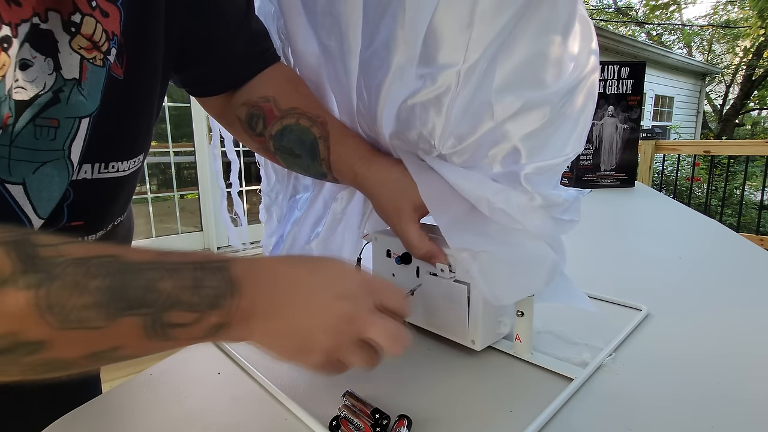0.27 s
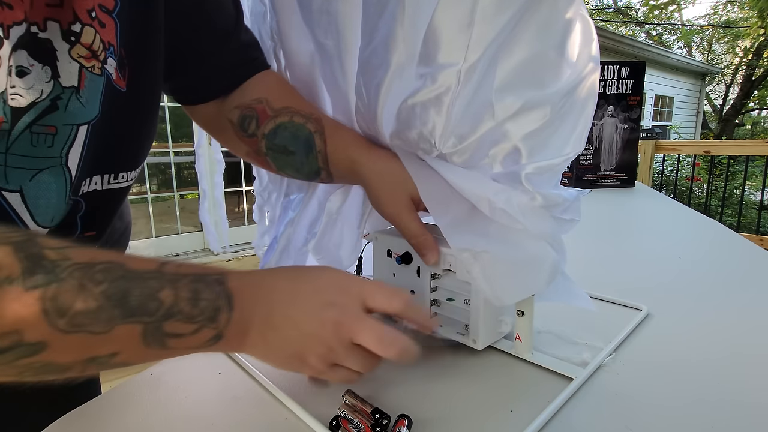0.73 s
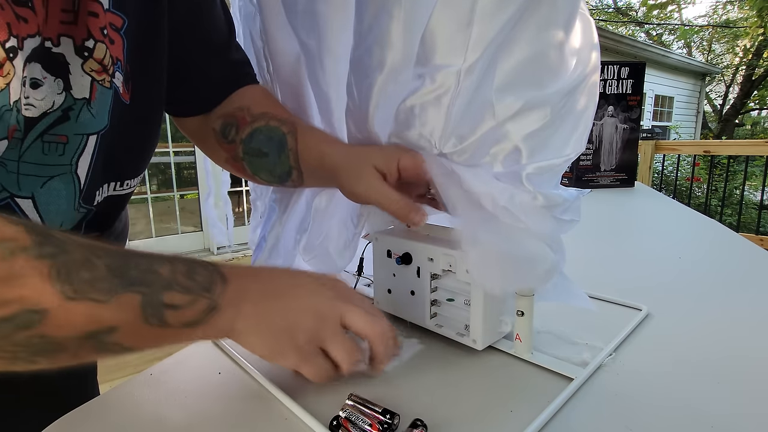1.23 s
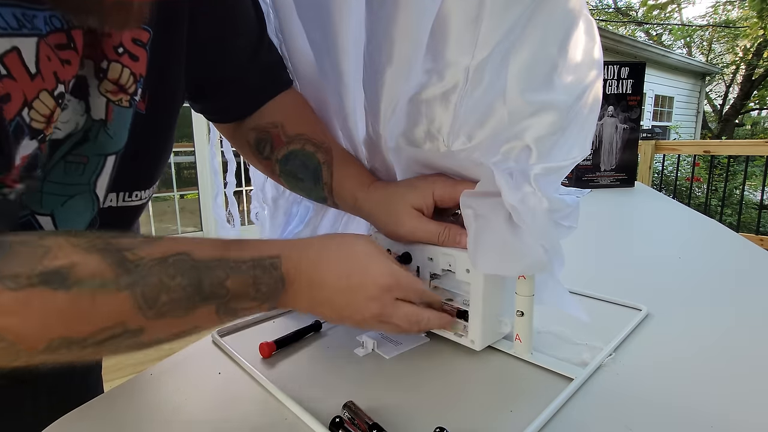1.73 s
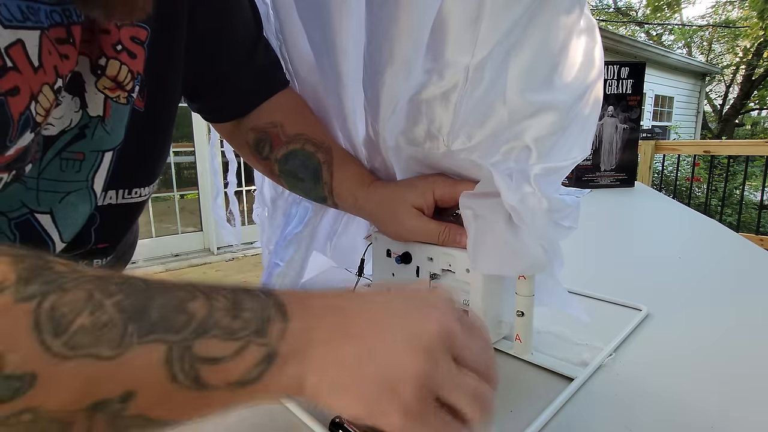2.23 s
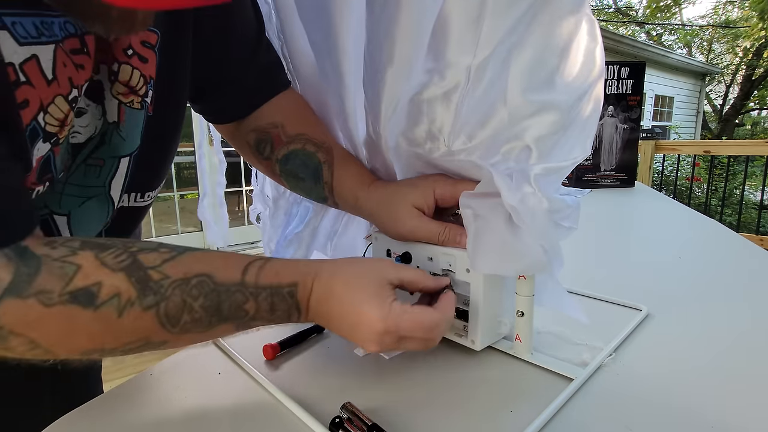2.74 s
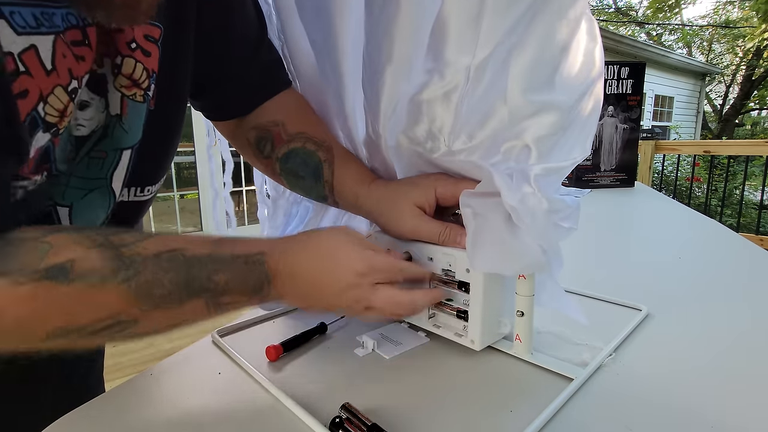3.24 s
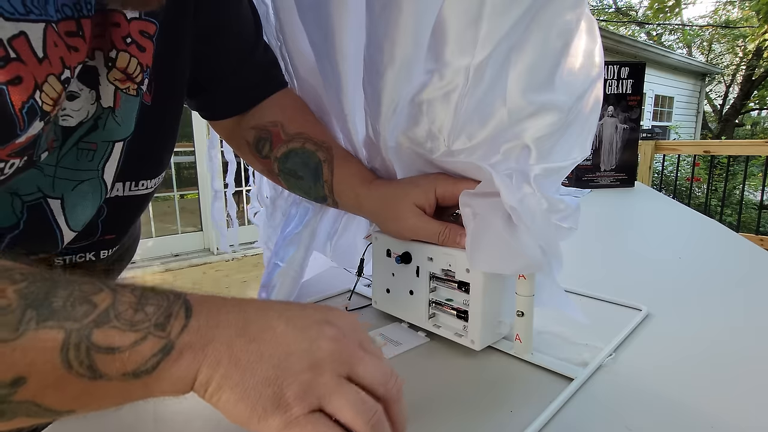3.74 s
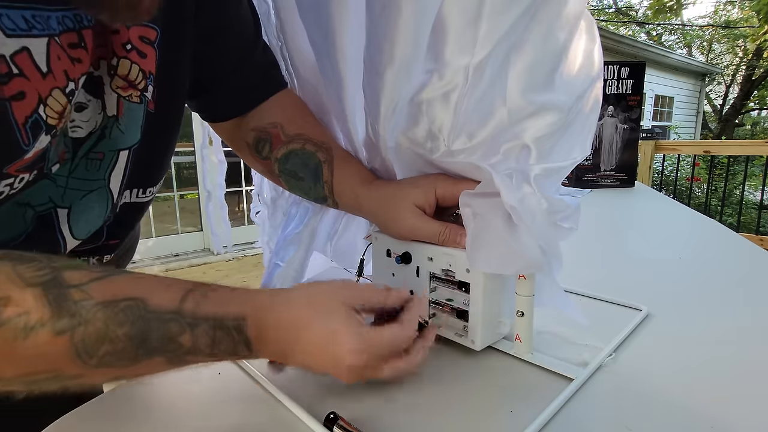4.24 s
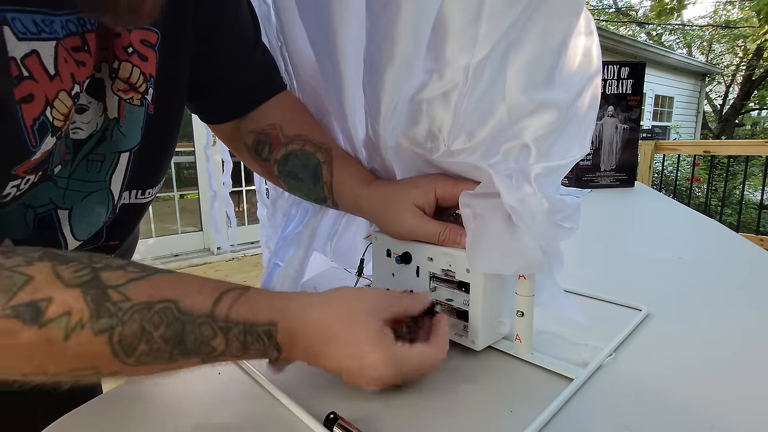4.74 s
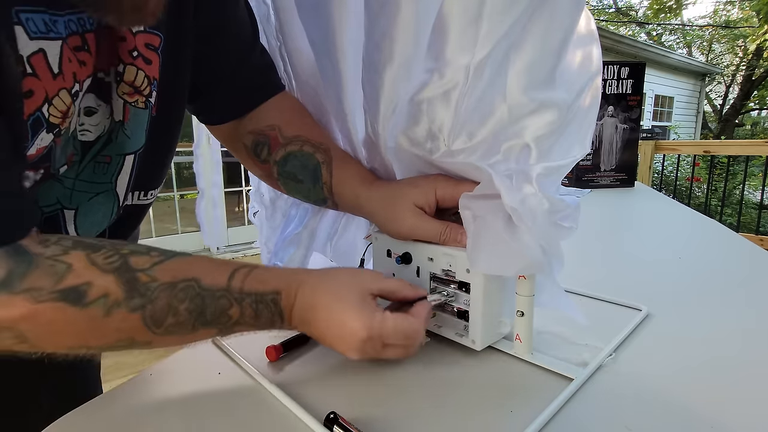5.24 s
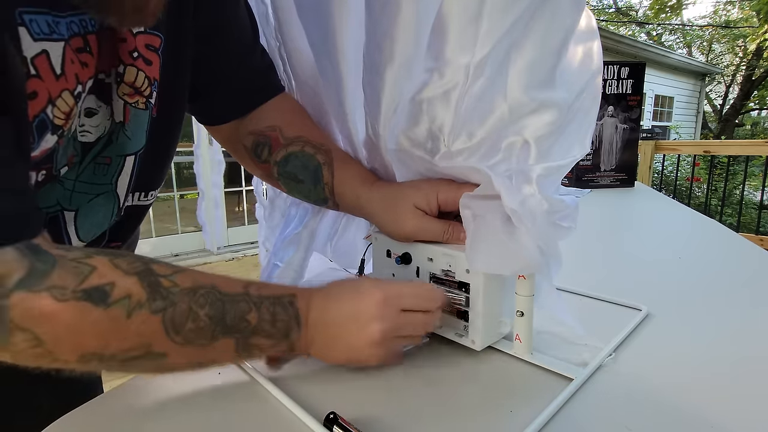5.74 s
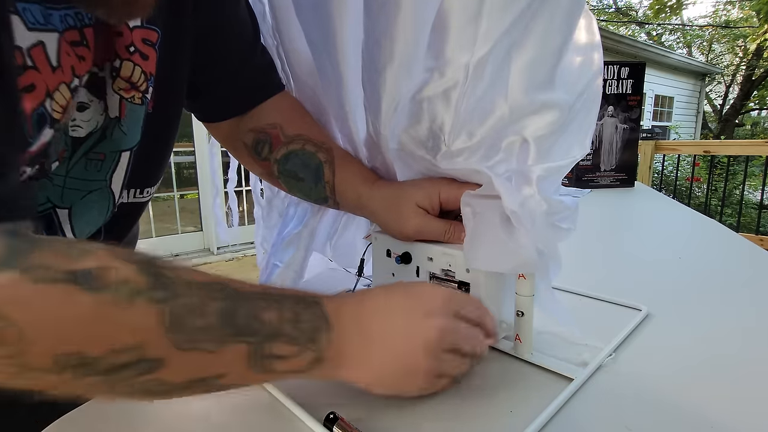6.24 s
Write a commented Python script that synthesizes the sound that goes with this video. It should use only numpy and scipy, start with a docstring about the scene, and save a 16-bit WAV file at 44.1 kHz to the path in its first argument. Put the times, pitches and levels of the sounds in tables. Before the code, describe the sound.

A thin plastic hatch clatters loose and a small tool drops on a table, then batteries knock and click into a hollow plastic housing outdoors.

```python
"""Open deck, plastic table: a hand drops the hatch of a plastic housing and a small tool,
then pushes batteries past their springs into the housing. Blows ring damped modes and noise bursts, with echoes;
rubbing and the noisy tails of blows are shaped noise, as is cloth. Breeze is lumpy bass noise, insects are
throbbing narrow bands, far traffic is low noise under a steady hush."""
import sys
import numpy as np
from scipy import signal
from scipy.fft import rfft, irfft
from scipy.io import wavfile
from scipy.ndimage import uniform_filter1d, map_coordinates

SR = 44100
rng = np.random.default_rng(int(sys.argv[2]) if len(sys.argv) > 2 else 0)


def attenuation_scalar(level_db):
    """Turn a level in dB into a linear amplitude multiplier (20 dB per decade)."""
    decades = np.asarray(level_db, float) / 20
    return 10 ** decades


def transcribe(u):
    """Save the signal u as a 16-bit wav file named by the first command-line argument.

    u: samples, shape (n,) or (channels, n), limited to [-1, 1]; the rate is SR.
    q: integer samples, one column per channel.
    """
    v = np.clip(np.atleast_2d(u).T, -1, 1)
    q = np.round(v * 32767).astype(np.int16)
    wavfile.write(sys.argv[1], SR, q)


N = 285900

# Hatch against housing and table: (time [s], body [dB], sharpness [dB], thud [dB], snap [dB])
HATCH_BLOWS = [(0.045, -22.5, 1, -48, -30), (0.319, -18.5, 8, -18, -5.5), (0.331, -21.5, 3.5, -12.5, -12),
               (0.369, -27, 8.5, -18, -19.5), (0.384, -26.5, 3, -20, -43), (0.63, -51, 19.5, -35, -78),
               (0.672, -14.5, -3, -13.5, -36), (0.68, -23, 7, -16.5, -13), (0.702, -28.5, 0, -19, -52),
               (0.737, -23, -1.5, -25, -30.5), (0.804, -44.5, 14.5, -34, -21), (1.149, -37, -13, -53, -24),
               (1.163, -20.5, -0.5, -31, -9.5), (1.431, -53, 10.5, -48, -31.5)]
# Dropped tool, later battery caps on springs: (time [s], body [dB], sharpness [dB], thud [dB], snap [dB])
METAL_BLOWS = [(0.932, -20, 8, -28.5, -10), (0.938, -34, 20, -38, -26), (1.005, -24.5, -13, -28, -23),
               (1.032, -27, -45, -30.5, -44), (1.103, -33, 8.5, -41, -26), (1.138, -27.5, -16, -31.5, -47),
               (5.246, -26.5, -34, -46, -26.5), (5.318, -46, -21, -46, -63.5),
               (5.943, -15.5, -27, -35, -13.5)]
# First battery in the empty bay: (time [s], body [dB], sharpness [dB], thud [dB], snap [dB])
EMPTY_BAY_BLOWS = [(1.681, -12.5, 7.5, -12, -13), (1.787, -33.5, -7, -73, -37)]
# Batteries against the filling housing: (time [s], body [dB], sharpness [dB], thud [dB], snap [dB])
BATTERY_BLOWS = [(2.803, -36.5, -13, -40, -57), (2.881, -26, -9, -26, -42.5), (2.91, -36, -7, -30, -53),
                 (2.958, -23, -10.5, -29, -34), (3.034, -13, -7, -22, -29.5), (3.045, -12, -8, -37, -34),
                 (3.073, -24.5, -4.5, -34, -59), (3.09, -34, -10, -35, -58), (3.196, -10.5, 4, -60, -15.5),
                 (3.205, -23.5, 3, -26.5, -58), (4.871, -69.5, 14, -35, -53), (5.154, -30, -17, -27, -52),
                 (5.257, -30, -27, -38, -65), (5.41, -18.5, -8.5, -26, -47), (5.507, -35.5, -0.5, -52, -55),
                 (5.73, -27.5, -10.5, -39.5, -68), (5.81, -22, -12.5, -25.5, -58),
                 (5.823, -26, -9, -32, -61), (5.846, -23.5, -7, -42, -36), (5.868, -16.5, 1.5, -30, -60),
                 (5.882, -24, -13, -29, -60), (6.03, -31.5, 6, -45, -35), (6.153, -17, 5, -27.5, -22.5),
                 (6.197, -38.5, 2, -46, -52)]
# Hatch modes, nominal: (frequency [Hz], level [dB], t60 [s])
HATCH_MODES = [(141, 4.5, 0.075), (234.5, -1.5, 0.17), (381, 8.5, 0.043), (607, -2, 0.16),
               (1132, 5.5, 0.053), (1443, 6.5, 0.017), (1650, 7.5, 0.054), (3396, 7, 0.06),
               (4400, 0.5, 0.0035)]
# Housing modes, nominal; faint long rings are the springs: (frequency [Hz], level [dB], t60 [s])
HOUSING_MODES = [(247.4, 12.5, 0.079), (395.4, 1.5, 0.16), (531, -1.5, 0.1), (631, 5, 0.078), (628, -24, 1),
                 (695, -5.5, 0.074), (1212, -6.5, 0.063), (1450, 8.5, 0.0091), (1370, -26, 0.59),
                 (2100, 1.5, 0.026), (2396, 7.5, 0.022), (3300, -0.5, 0.045)]
# Tool and cap modes, nominal: (frequency [Hz], level [dB], t60 [s])
METAL_MODES = [(124, 0, 0.075), (723, -11, 0.025), (1724, 5.5, 0.067), (1800, -18.5, 0.06),
               (2864, -19, 0.066), (3500, -20, 0.05), (4160, -15.5, 0.0086)]
# Empty bay modes, nominal: (frequency [Hz], level [dB], t60 [s])
EMPTY_BAY_MODES = [(400, 3, 0.062), (648, 0, 0.045), (1196, 14, 0.02), (1446, 15.5, 0.01),
                   (1650, -2, 0.087), (2860, 5, 0.024), (3500, 5, 0.0307)]
# Knock and clack of the hatch: (knock re body [dB], sharpness share, clack re body [dB], sharpness share)
HATCH_VOICE = (-0.78, -0.45, -0.24, -0.3)
# The same of metal: (knock re body [dB], sharpness share, clack re body [dB], sharpness share)
METAL_VOICE = (-14.5, -0.02, 3, 0.07)
# The same of the empty bay: (knock re body [dB], sharpness share, clack re body [dB], sharpness share)
EMPTY_BAY_VOICE = (-4, 0.68, -6.5, 0.52)
# The same of the filling housing: (knock re body [dB], sharpness share, clack re body [dB], sharpness share)
HOUSING_VOICE = (-1, 0.12, -12, 1.9)
# Bounds between thud, knock, rap and clack modes: (frequency [Hz])
MODE_GROUP_EDGES_HZ = (450, 900, 2300)
# Snap spectrum before tilt and band limits: (frequency [Hz], density [dB per Hz])
SNAP_SPECTRUM = [(2650, 15.5), (4500, 13), (5560, 1.5), (7100, 7), (8550, -2.5), (13300, 1.5),
                 (15500, -5.5)]
# Rubbing noise and noisy tails after blows, levels before the envelope:
# (time [s], length [ms], drag [dB], scuff [dB], scuff pitch [Hz])
STROKES = [(0.185, 32.6, -31, -32, 2650), (0.337, 85, -44, -32, 1974), (0.631, 180, -35.5, -50.5, 3020),
           (0.684, 201, -32, -41, 3500), (.95, 180, -43.5, -40.5, 3300), (1.171, 186, -35, -42, 3560),
           (1.285, 210, -39.5, -42, 3390), (2.241, 53, -29, -44, 4050), (3.012, 123, -33.5, -50, 1840),
           (3.176, 170, -47, -45.5, 2370), (5.169, 210, -47.5, -58, 2560), (5.489, 62, -38.5, -44, 2615),
           (5.55, 490, -47, -82, 2010), (5.76, 220, -41, -51.5, 2380), (5.945, 310, -77, -49, 3620),
           (6.161, 62, -55, -45, 1990)]
# Squeak lines: (share of scuff pitch)
SQUEAK_SHARES = (0.37, 0.8, 0.98)
# Cloth level before lumps: (time [s], level [dB])
CLOTH_LEVEL = [(0.0, -58), (0.8, -57), (1.2, -45.5), (1.42, -56), (2.8, -59.5), (3.23, -52.5),
               (3.52, -59.5), (5.0, -59.5), (5.75, -56), (5.97, -51), (6.07, -45), (6.14, -62), (6.3, -55),
               (6.48, -60.5)]
# Traffic rumble level: (time [s], level [dB])
RUMBLE_LEVEL = [(0.0, -38.5), (3.05, -42.5), (5.74, -41.5), (6.48, -38.5)]
# Breeze level before left-right imbalance: (time [s], level [dB])
BREEZE_LEVEL = [(0, -53), (2.2, -55.5), (2.7, -40.5), (3.1, -52), (5.7, -44), (6.2, -30.5), (6.48, -38.5)]
# Rumble spectrum before its top cut: (frequency [Hz], density [dB per Hz])
RUMBLE_SPECTRUM = [(12, -60), (24, -28), (37, -6), (46, -17.5), (65, 2), (161, -14), (182, -21),
                   (220, -16.5), (290, -58)]
# Open-air hush spectrum before its bass cut: (frequency [Hz], density [dB per Hz])
HUSH_SPECTRUM = [(150, -2.5), (205, -12), (240, -2), (321, -4), (391, -3), (466, -5.5), (730, -5.5),
                 (3700, -21), (5150, -17), (7320, -15.5), (8560, -47), (16000, -44)]
# Insect bands, level before drift and throb: (centre [Hz], width [Hz], level [dB])
INSECT_BANDS = [(4930, 540, -54.5), (5310, 320, -57.5), (6410, 630, -58.5), (7300, 650, -64.5)]
# Diffuse-field left-right likeness: (frequency [Hz], likeness [-1..1])
LIKENESS = [(60, 0.96), (130, 1), (290, 0.46), (640, -0.35), (1410, -0.58), (3100, 0.038), (6820, 0.049),
            (15000, -0.34)]
# Microphone port imbalance: (frequency [Hz], left minus right [dB])
PORT_BALANCE = [(60, -4), (150, -1.5), (380, -4.5), (950, -1.5), (2380, -1), (5980, 0), (15000, -5.5)]
# Two echoes from nearby surfaces: (delay [ms], relative level [dB])
ECHOES = [(11, -13), (47, -26.5)]

SOFT_LOWPASS = signal.butter(2, 1000, fs=SR, output="sos")
WALL_HIGHPASS = signal.butter(4, 440, "high", fs=SR, output="sos")


def rms_one(x):
    """Scale to rms 1."""
    return x / np.sqrt(np.mean(x ** 2) + 1e-20)


def in_time(rows):
    """Interpolate a (time, level) table, one value a sample."""
    time_s, level_db = np.transpose(rows)
    return np.interp(np.arange(N) / SR, time_s, level_db)


def at_hz(points, hz):
    """Interpolate a table on a log-frequency axis."""
    points_hz, values = np.transpose(points)
    return np.interp(np.log(np.maximum(hz, 1)), np.log(points_hz), values)


def colour(x, gain):
    """Multiply the spectrum by gain(hz)."""
    size = x.shape[-1]
    return irfft(rfft(x) * gain(np.arange(size // 2 + 1) * SR / size), size)


def hump(centre_hz, width_hz):
    """Gain of a resonance applied twice."""
    return lambda hz: 1 / (1 + (2 * (hz - centre_hz) / width_hz) ** 2)


def band(low_hz, high_hz):
    """Gain of a band with steep skirts."""
    return lambda hz: 1 / np.sqrt((1 + (low_hz / (hz + 1)) ** 8) * (1 + (hz / high_hz) ** 8))


def fading(noise, low_hz, high_hz, t60_s):
    """Band of noise with exponential decay."""
    return colour(noise, band(low_hz, high_hz)) * attenuation_scalar(-60 * np.arange(noise.shape[1]) / SR / t60_s)


def drift(rate_hz):
    """Slow random curve of spread about 1: a spline through two knots per cycle of rate_hz."""
    knots = rng.standard_normal(1000)
    return map_coordinates(knots, [np.arange(N) / SR * np.clip(rate_hz, 0, 70) * 2], order=3)


def wide_noise():
    """Stereo noise, left and right as alike as a diffuse field is at each pitch."""
    mid, side = rng.standard_normal((2, N))
    mid = colour(mid, lambda hz: np.sqrt(1 + np.clip(at_hz(LIKENESS, hz), -1, 1)))
    side = colour(side, lambda hz: np.sqrt(1 - np.clip(at_hz(LIKENESS, hz), -1, 1)))
    return np.array([mid + side, mid - side])


def distance():
    """Traffic rumble that swells and sinks, over the steady hush of the open air."""
    rumble = colour(wide_noise(), lambda hz: attenuation_scalar(at_hz(RUMBLE_SPECTRUM, hz) - 44 * (hz > 220)))
    hush = colour(wide_noise(), lambda hz: attenuation_scalar(at_hz(HUSH_SPECTRUM, hz) - 59 * (hz < 150)))
    hush_db = -48.5
    return attenuation_scalar(in_time(RUMBLE_LEVEL)) * rms_one(rumble) + attenuation_scalar(hush_db) * rms_one(hush)


def breeze():
    """Air on the microphone ports: lumpy bass, independent left and right, more on the left."""
    lumps = colour(rng.standard_normal((2, N)), band(32, 93)) * attenuation_scalar(4.4 * drift(5))
    side_db = np.array([[2.5], [-2.5]])
    return attenuation_scalar(in_time(BREEZE_LEVEL)) * rms_one(lumps) * attenuation_scalar(side_db)


def insects():
    """Far chorus: narrow noise bands, throbbing together at the song's pulse rate."""
    pulse_hz = 65 * (1 + 0.0041 * drift(0.63))
    throb = 1 + 0.18 * np.sin(2 * np.pi * np.cumsum(pulse_hz) / SR)
    out = np.zeros((2, N))
    for centre_hz, width_hz, level_db in INSECT_BANDS:
        song = rms_one(colour(wide_noise(), hump(centre_hz, width_hz)))
        out += attenuation_scalar(level_db + 1.0 * drift(3.03)) * throb * song
    return out


def cloth():
    """Sleeves and drapes swish in the top treble; harder movement rustles in deeper lumps."""
    level_db = in_time(CLOTH_LEVEL)
    lumps_db = 0.21 * (level_db - level_db.min()) * drift(18)
    return attenuation_scalar(level_db + lumps_db) * rms_one(colour(wide_noise(), hump(14960, 8000)))


def contact_rattle(noise, rise):
    """Impulsive contacts that swell and die, led by a strong first touch."""
    contacts = noise ** 3 * (rise + 0.2) * np.exp(-2 * rise)
    contacts[0] = 0.83 * np.linalg.norm(contacts)
    return contacts


def ring_modes(modes, contacts, levels_db, t, detune_share, phase_hz):
    """Damped modes summed in four pitch groups; grip shifts and damps them anew each blow."""
    hz, level_db, t60_s = np.repeat(modes, 2, axis=0).T      # close pairs
    group = np.searchsorted(MODE_GROUP_EDGES_HZ, hz)
    gain_chance, gap_chance, pitch_chance, decay_chance = rng.standard_normal((4, len(hz)))
    turns = np.exp(2j * np.pi * hz * (1 + detune_share * pitch_chance) * t[:, None])
    grip_t60_s = t60_s * np.exp(0.25 * decay_chance)
    fade = np.hanning(2 * len(t))[len(t):]      # to zero at the end of the ring
    rings = attenuation_scalar(level_db - 60 * t[:, None] / grip_t60_s) * turns * fade[:, None]
    # Rattle feeds all modes about evenly
    fed = np.abs(contacts @ turns[:len(contacts)]) / np.linalg.norm(contacts) + 0.3
    # Half the left-right phase gap [rad]; widens with pitch up to a limit
    half_gap = gap_chance * np.minimum(hz / phase_hz, 1.6) / 2
    # Modes lean towards the louder neighbouring group
    levels = np.array([levels_db[0], *levels_db])
    neighbour_db = np.clip(levels[group + 2] - levels[group], -20, 20)
    lean_db = 0.83 * neighbour_db * np.log2(hz / np.array([280, 640, 1440, 3400])[group])
    weights = attenuation_scalar(2.95 * gain_chance + lean_db) / fed * np.exp(1j * np.outer([1, -1], half_gap))
    return [(weights[:, group == k] @ rings[:, group == k].T).imag for k in range(4)]


def blows(events, modes, voice, detune_share, rattle_ms, crack_db, crack_t60_s, snap_t60_s,
          snap_tilt_db_per_oct, phase_hz, cut_hz, lead_in_db):
    """Each blow: a short rattle of contacts that rings modes, cracks as dense noise and snaps in the treble."""
    out, t = np.zeros((2, N + SR)), np.arange(SR // 5) / SR
    rise = t[:SR // 25] * 2000 / rattle_ms
    thud_lag = round(0.00592 * SR)      # the table answers a little after the contact
    lead_size = round(0.013 * SR)
    for time_s, body_db, sharp_db, thud_db, snap_db in events:
        at = round(time_s * SR)
        rap_db = body_db + sharp_db
        knock_db, clack_db = body_db + np.array(voice[::2]) + sharp_db * np.array(voice[1::2])
        levels_db = (thud_db, knock_db, rap_db, clack_db, snap_db)
        grit = rng.standard_normal((5, len(t)))
        contacts = contact_rattle(grit[0, :len(rise)], rise)
        sounds = ring_modes(modes, contacts, levels_db, t, detune_share, phase_hz)

        # Modes too dense to count: crack_db and crack_t60_s are scaled per group
        crack = grit[1:3]
        sounds[1] += attenuation_scalar(crack_db + 10.5) * fading(crack, 560, 700, 1.35 * crack_t60_s)
        sounds[2] += attenuation_scalar(crack_db + 10) * fading(crack, 900, 2300, 0.8 * crack_t60_s)
        sounds[3] += attenuation_scalar(crack_db) * fading(crack, 2250, 5860, 0.89 * crack_t60_s)

        def snap_gain(hz):
            tilt_db = snap_tilt_db_per_oct * np.log2(hz / 8000 + 0.01)
            return attenuation_scalar(at_hz(SNAP_SPECTRUM, hz) + tilt_db)

        sounds.append(fading(colour(grit[3:], snap_gain), 4800, 20000, snap_t60_s))

        # The soft part of the contact drives thud and knock; thin walls radiate no bass
        sounds[:2] = signal.sosfilt(SOFT_LOWPASS, sounds[:2])
        sounds[1:4] = signal.sosfilt(WALL_HIGHPASS, sounds[1:4])
        sounds[0] = np.pad(sounds[0], ((0, 0), (thud_lag, 0)))[:, :len(t)]
        for sound, level_db in zip(sounds, levels_db):
            sound = signal.fftconvolve(sound, contacts[None], axes=1)
            power = uniform_filter1d(np.mean(sound ** 2, axis=0), size=220)
            out[:, at:at + sound.shape[1]] += attenuation_scalar(level_db) * sound / np.sqrt(power.max())

        # Short noise ramp leading into each blow
        lead_noise = rms_one(colour(grit[3:], band(700, 8800)))[:, :lead_size]
        lead_noise = lead_noise * np.linspace(0, 1, lead_size) ** 2
        end = at + 40
        out[:, end - lead_size:end] += attenuation_scalar(max(rap_db, clack_db) + lead_in_db) * lead_noise
    # Small bodies radiate no bass
    return signal.sosfilt(signal.butter(3, cut_hz, "high", fs=SR, output="sos"), out[:, :N])


def deck(x):
    """Two dull echoes from nearby surfaces, each smeared into a short noise tail."""
    tail, smear = np.zeros((2, SR // 8)), round(0.024 * SR)
    fade = np.hanning(2 * smear)[smear:]
    for delay_ms, relative_db in ECHOES:
        lag = round(delay_ms * SR / 1000)
        tail[:, lag:lag + smear] += attenuation_scalar(relative_db - 29.0) * rng.standard_normal((2, smear)) * fade
    tail = signal.sosfilt(signal.butter(2, 2500, fs=SR, output="sos"), tail)
    return signal.fftconvolve(x, tail, axes=1)[:, :N]


def rubbing():
    """Rubbing and noisy blow tails as grains: low drag, resonant scuff with squeaks, hiss on top."""
    slips_per_s, slip_db, squeak_db, grit_re_scuff_db = 150, 0, -8.5, -4
    sag_share = 0.11      # scuff pitch above and below its centre
    out, grains = np.zeros((2, N)), wide_noise() * attenuation_scalar(2.4 * drift(65))
    # Single slips stand out and decay at 500 nepers/s
    impulses = (rng.random(N) < slips_per_s / SR) * rng.uniform(0, 2, N)
    slips = signal.lfilter([1], [1, -np.exp(-500 / SR)], impulses)
    grains = grains * (1 + attenuation_scalar(slip_db) * slips)
    wander = drift(12)
    for time_s, length_ms, drag_db, scuff_db, scuff_hz in STROKES:
        at, size = round(time_s * SR), round(length_ms * SR / 1000)
        piece, along = grains[:, at:at + size], np.linspace(0, 1, size)
        drag = colour(piece, lambda hz: hump(400, 300)(hz) + hump(640, 250)(hz) + hump(1200, 700)(hz))
        broad = colour(piece, lambda hz: hump(scuff_hz, 700)(hz) + 0.3 * hump(scuff_hz, 3500)(hz))
        # Narrow lines wander, and sink in pitch along the envelope
        bend = 1 + sag_share * (1 - 2 * along) + 0.0151 * wander[at:at + size]
        slow = rms_one(colour(piece, hump(0, 160)))
        squeak = np.zeros_like(piece)
        for k, share in enumerate(SQUEAK_SHARES):
            line = np.sin(2 * np.pi * np.cumsum(scuff_hz * share * bend) / SR)
            squeak += np.roll(slow, 999 * k, axis=1) * line
        scuff = rms_one(broad) + attenuation_scalar(squeak_db) * squeak
        hiss = colour(piece, lambda hz: hump(13500, 5000)(hz) + 0.5 * hump(6500, 3000)(hz))
        mix = attenuation_scalar(drag_db) * rms_one(drag) + attenuation_scalar(scuff_db) * rms_one(scuff)
        mix += attenuation_scalar(scuff_db + grit_re_scuff_db) * rms_one(hiss)
        envelope = np.minimum(along * length_ms / 6, 1) * (1 - along ** 1.55)     # quick rise, slow fall
        out[:, at:at + size] += envelope * mix
    return out


def scene():
    """Blows with their echoes over rubbing, cloth, insects, breeze and distance."""
    near = blows(HATCH_BLOWS, HATCH_MODES, HATCH_VOICE, detune_share=0.0566, rattle_ms=4.74,
                 crack_db=12.0, crack_t60_s=0.063, snap_t60_s=0.023, snap_tilt_db_per_oct=1.5,
                 phase_hz=710, cut_hz=149, lead_in_db=-12.5)
    near += blows(METAL_BLOWS, METAL_MODES, METAL_VOICE, detune_share=0.004, rattle_ms=5,
                  crack_db=-4, crack_t60_s=0.042, snap_t60_s=0.032, snap_tilt_db_per_oct=9.0,
                  phase_hz=710, cut_hz=120, lead_in_db=-51)
    near += blows(EMPTY_BAY_BLOWS, EMPTY_BAY_MODES, EMPTY_BAY_VOICE, detune_share=0.016, rattle_ms=8.2,
                  crack_db=5.5, crack_t60_s=0.093, snap_t60_s=0.0094, snap_tilt_db_per_oct=11.0,
                  phase_hz=1470, cut_hz=110, lead_in_db=-19.5)
    near += blows(BATTERY_BLOWS, HOUSING_MODES, HOUSING_VOICE, detune_share=0.033, rattle_ms=5.0,
                  crack_db=6.5, crack_t60_s=0.059, snap_t60_s=0.02, snap_tilt_db_per_oct=1.5,
                  phase_hz=1450, cut_hz=144, lead_in_db=-20.5)
    return near + deck(near) + rubbing() + cloth() + insects() + breeze() + distance()


def band_limit(x):
    """A steep low-pass at the top of the band."""
    return signal.sosfilt(signal.butter(12, 16380, fs=SR, output="sos"), x)


def record(dry):
    """Unequal microphone ports, then hard clipping at full scale."""
    left = colour(dry[0], lambda hz: attenuation_scalar(at_hz(PORT_BALANCE, hz) / 2))
    right = colour(dry[1], lambda hz: attenuation_scalar(-at_hz(PORT_BALANCE, hz) / 2))
    mix = np.clip([left, right], -1, 1)
    return band_limit(mix)


dry = scene()
out = record(dry)
transcribe(out)
```